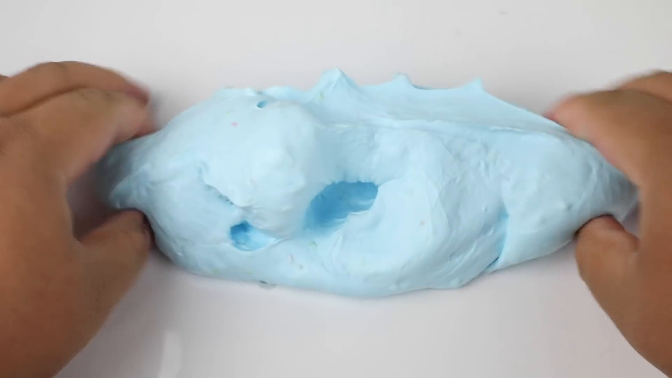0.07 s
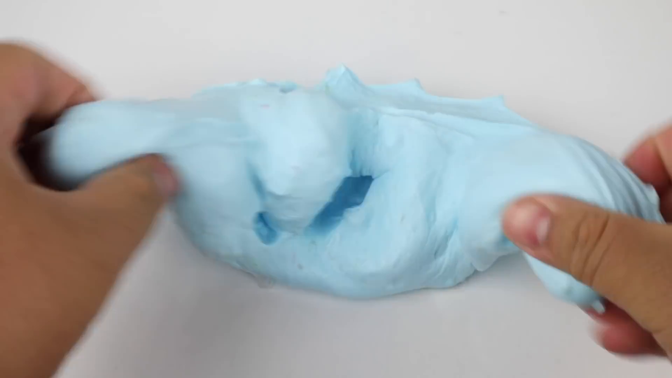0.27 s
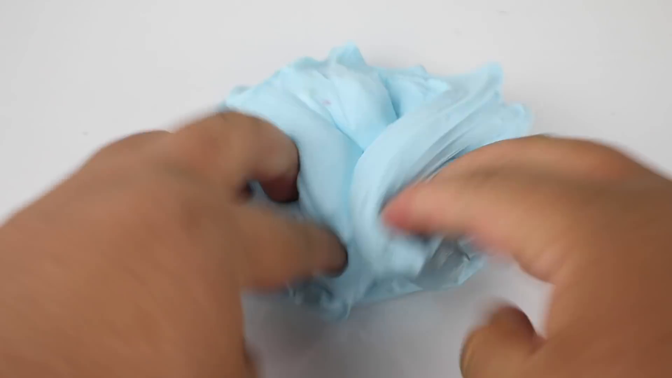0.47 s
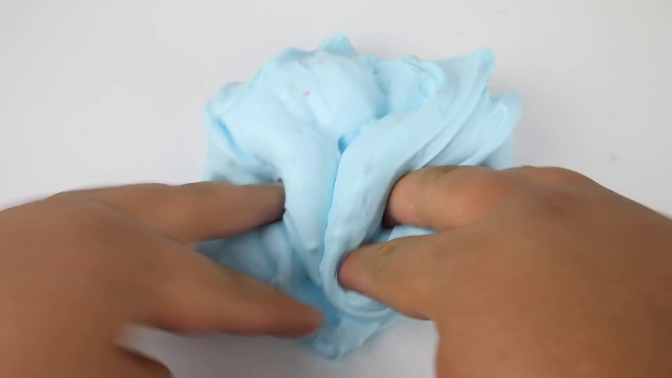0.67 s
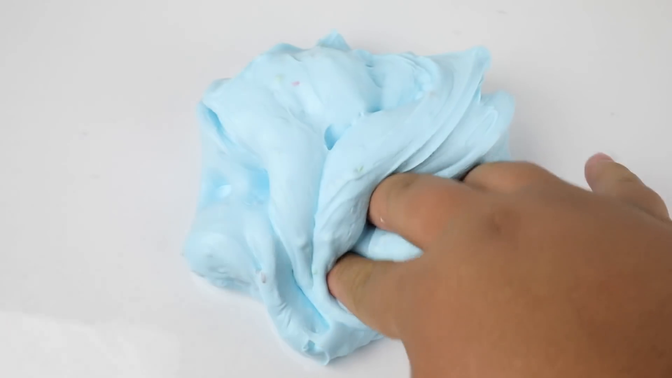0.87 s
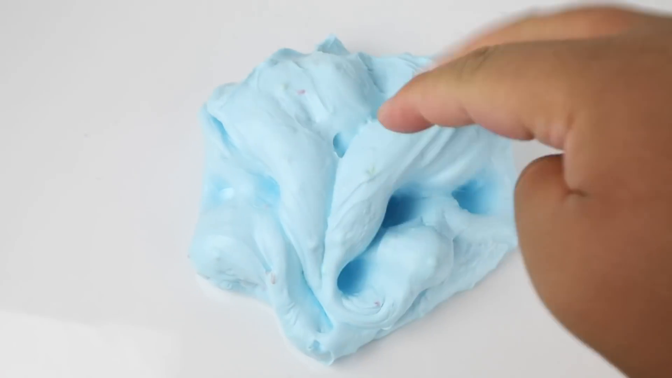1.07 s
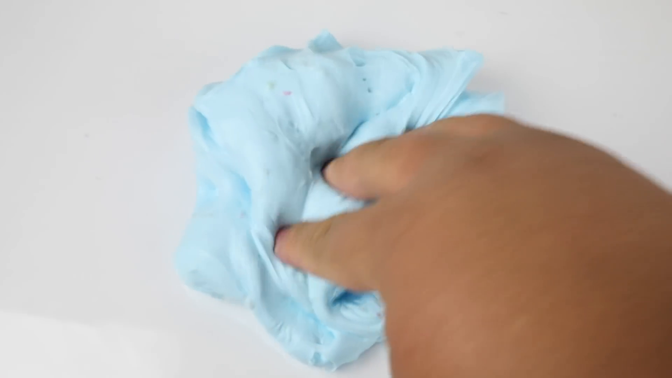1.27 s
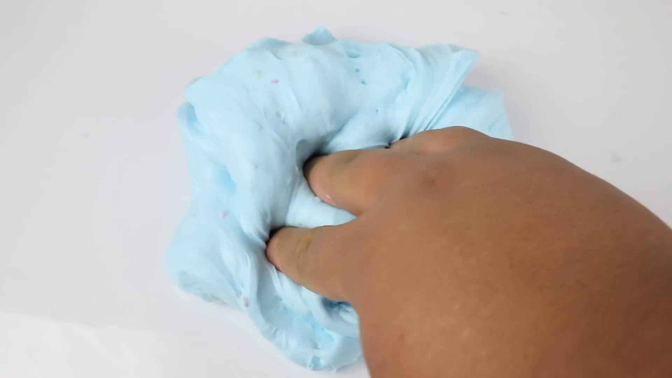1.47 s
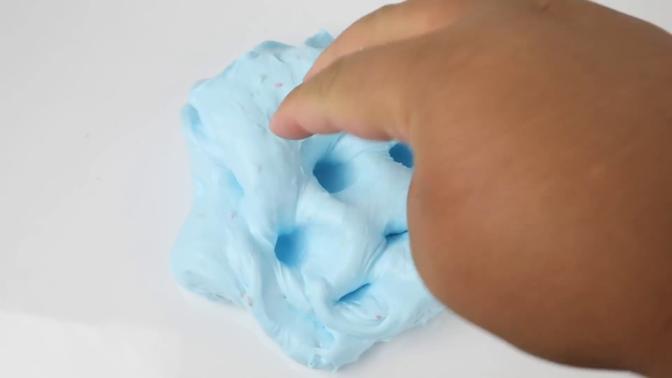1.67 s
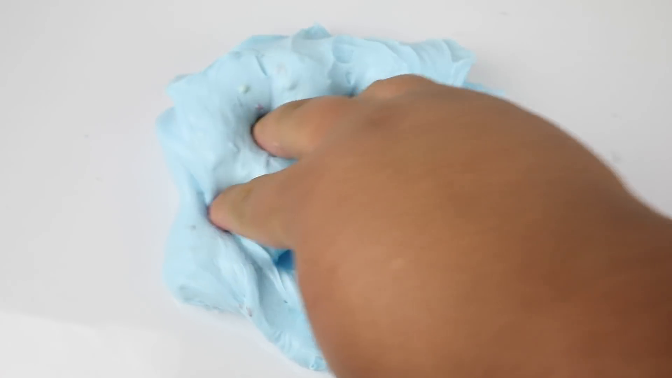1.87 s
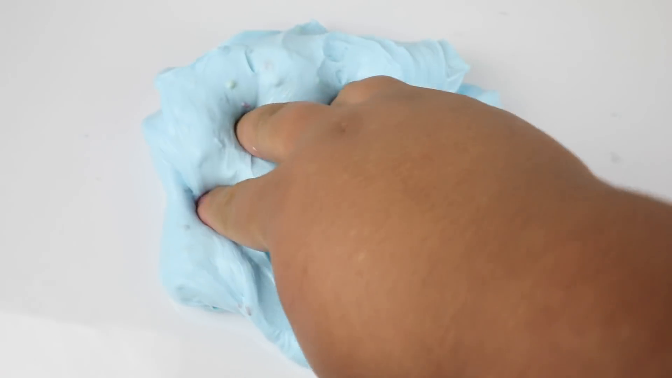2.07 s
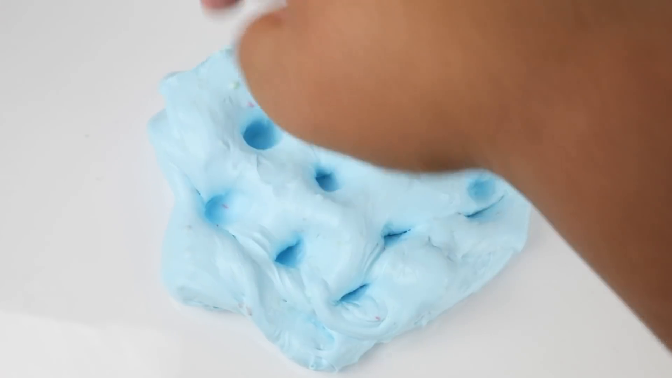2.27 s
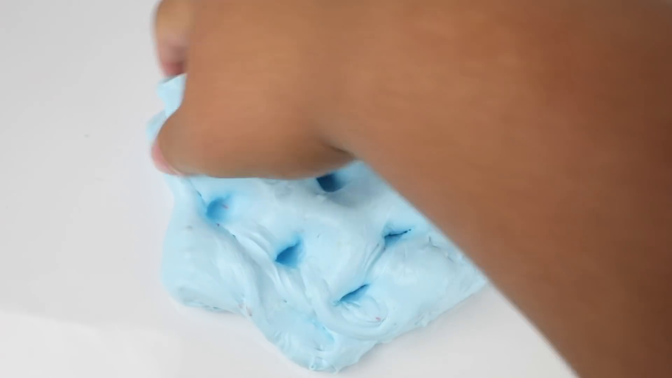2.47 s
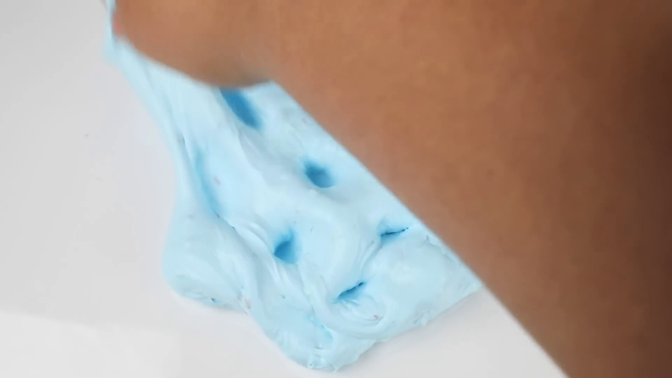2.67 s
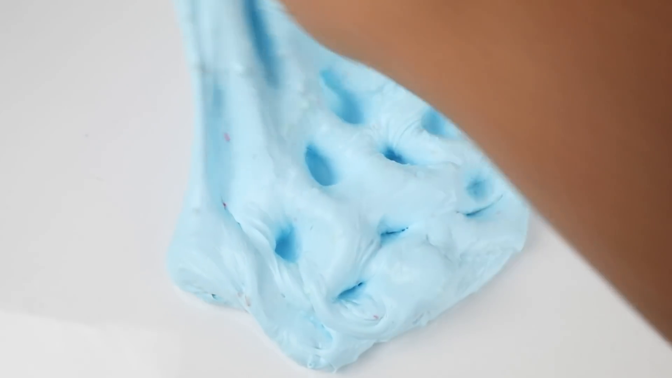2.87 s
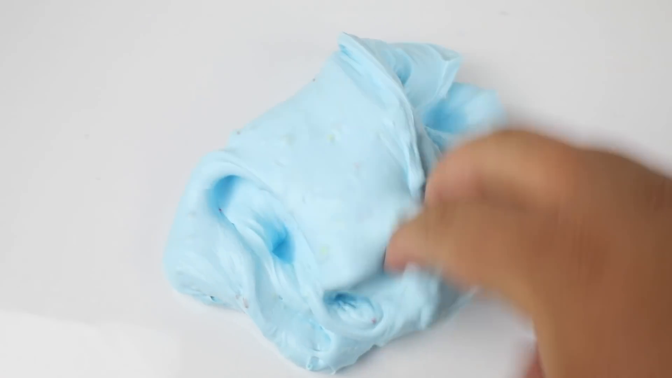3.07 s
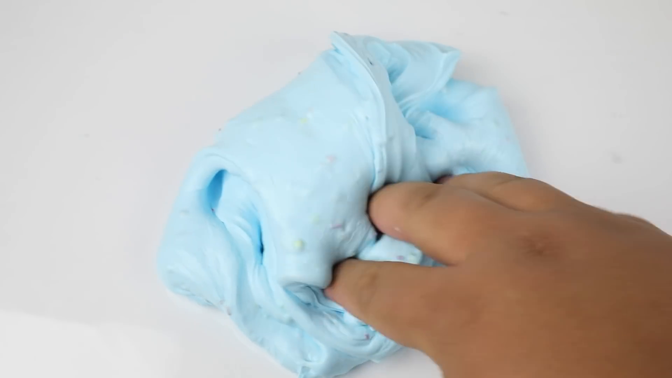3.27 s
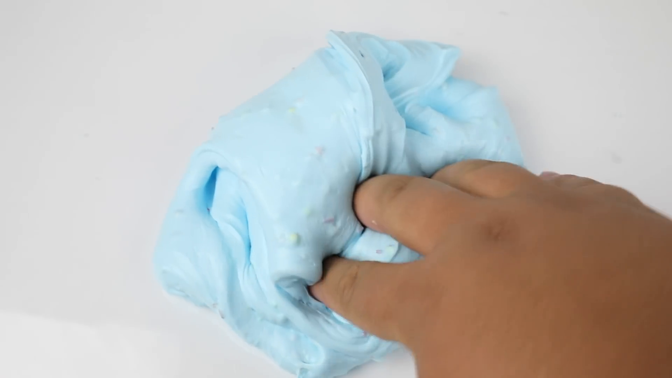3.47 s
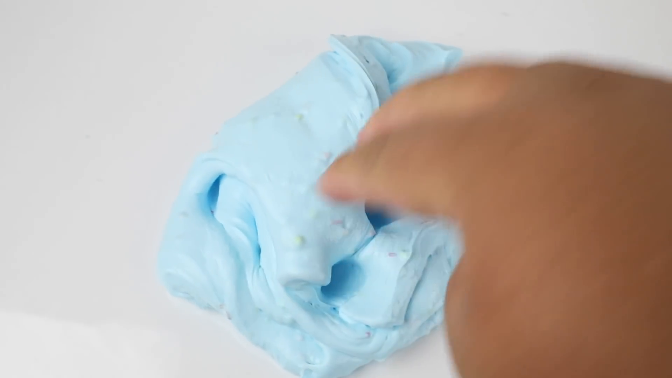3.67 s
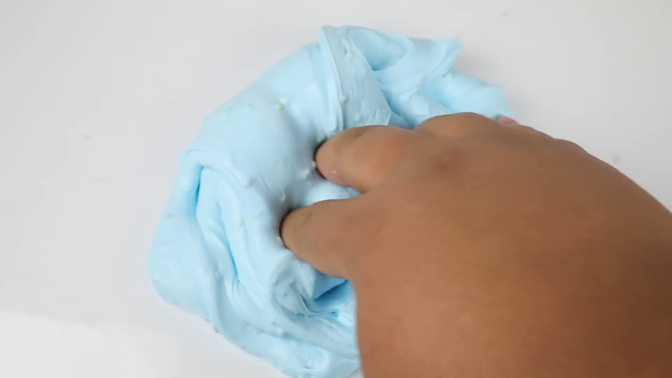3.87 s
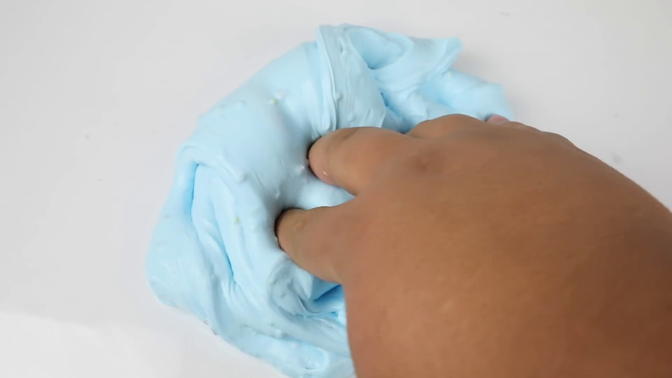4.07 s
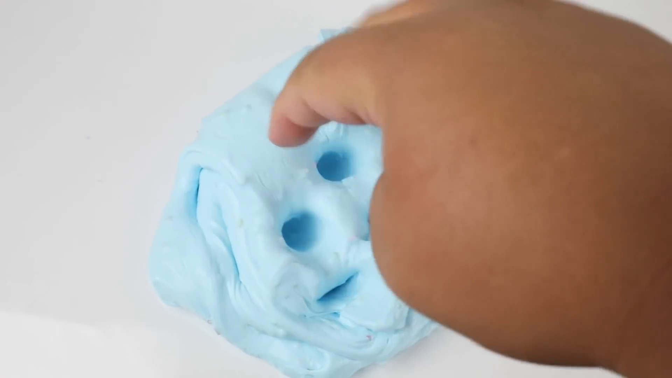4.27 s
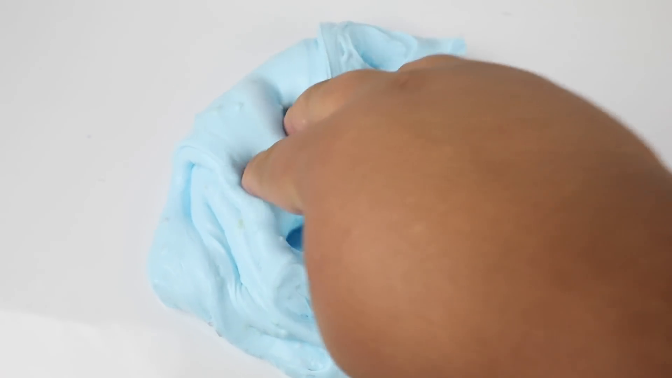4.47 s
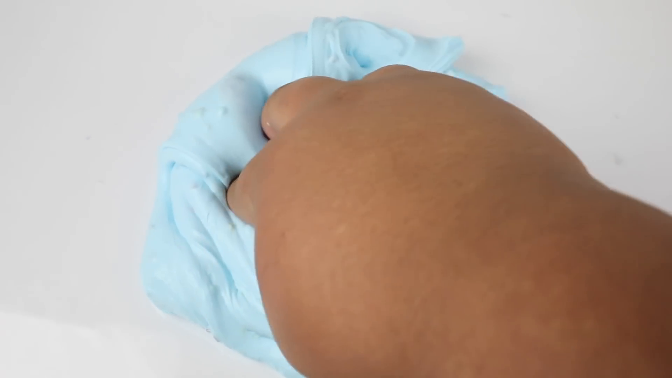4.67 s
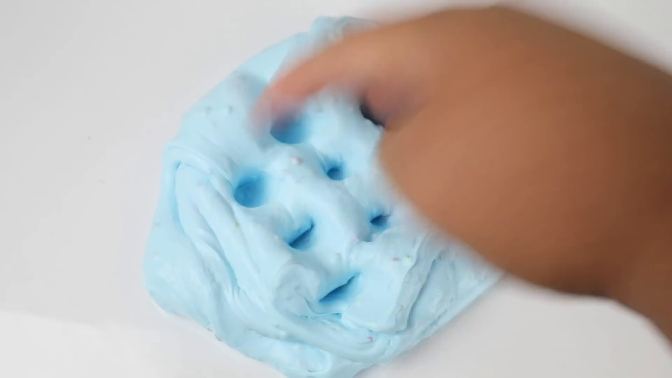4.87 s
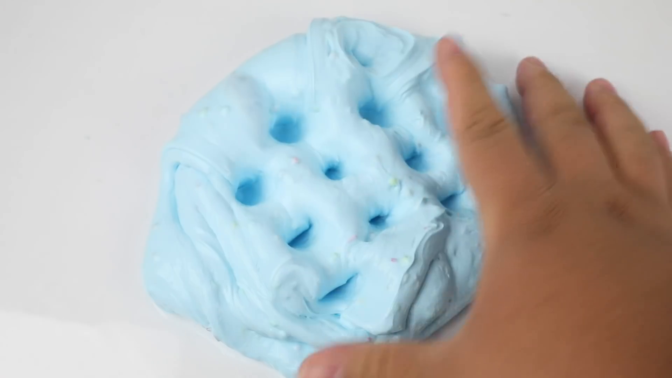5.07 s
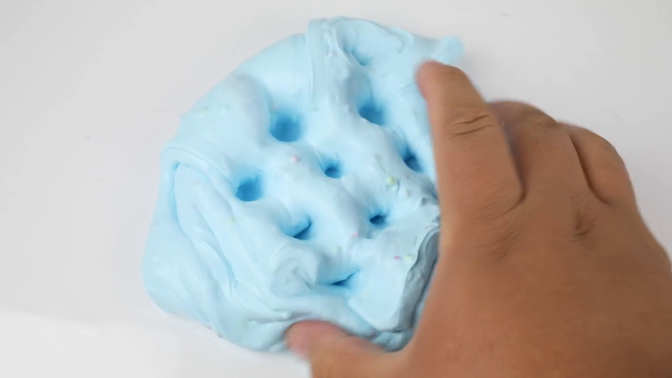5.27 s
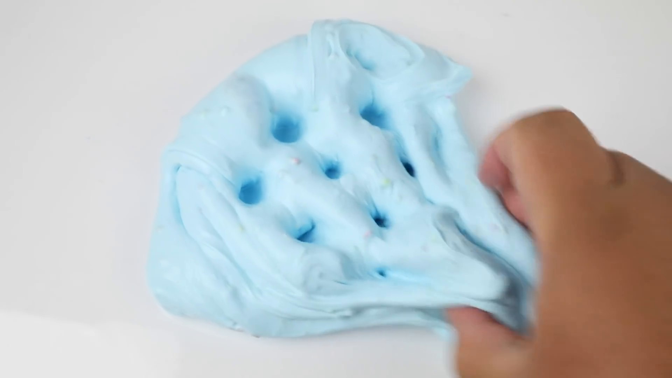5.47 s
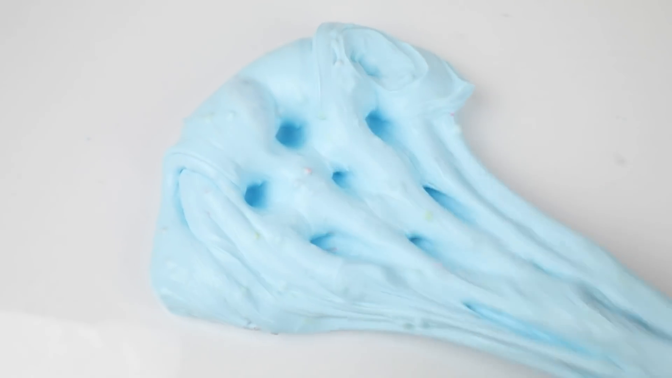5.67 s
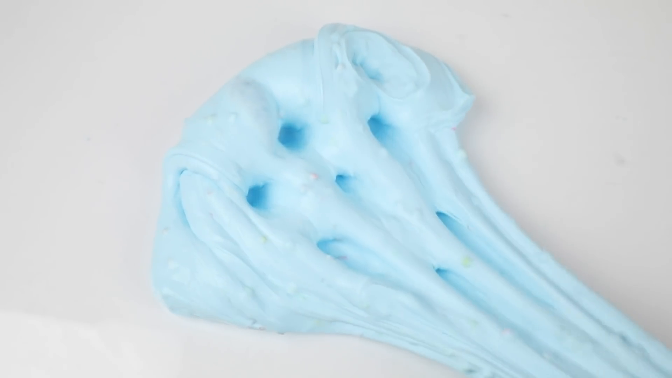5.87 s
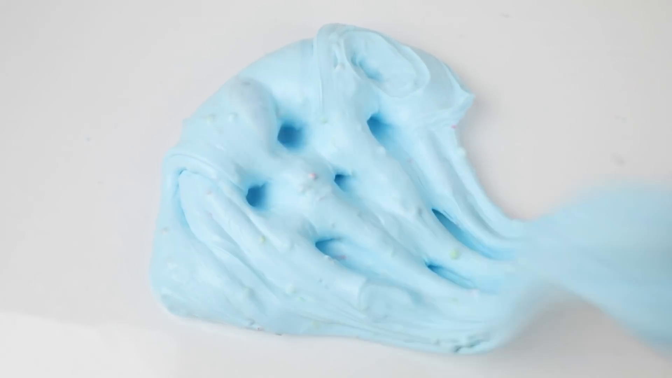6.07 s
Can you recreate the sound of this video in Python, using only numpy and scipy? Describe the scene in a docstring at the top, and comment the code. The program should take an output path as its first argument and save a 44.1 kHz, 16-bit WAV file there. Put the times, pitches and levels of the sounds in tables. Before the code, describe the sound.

Close, dry slime play: soft folding squelches, then repeated bursts of explosive wet pops as fingers poke and pull out, over quiet room air.

```python
"""A small room, close to a table: fingers poke holes in thick slime and pull out.
Each seal tears with a crack of noise, and the hole plops as a sine falling in pitch while it opens.
Pokes and hands ring the table top's modes; folding and stretching squelch in grains and hiss.
Short snaps tick, air, microphone hiss and rumble lie beneath, the room rings on behind the slime,
and the loudest pops overload the recorder."""
import sys
import numpy as np
from scipy import signal
from scipy.fft import rfft, irfft
from scipy.io import wavfile
from scipy.ndimage import uniform_filter1d

SR = 44100
rng = np.random.default_rng(int(sys.argv[2]) if len(sys.argv) > 2 else 0)


def inscribe(sig):
    """Save sig as 16-bit PCM at rate SR to the path in sys.argv[1].

    A 1-D sig is mono; a 2-D sig holds one channel per row.
    Samples are clipped to [-1, 1] before scaling.
    """
    pcm = np.round(np.clip(np.atleast_2d(sig).T, -1, 1) * 32767)
    wavfile.write(sys.argv[1], SR, pcm.astype(np.int16))


def gain_from_db(level_db):
    """Turn a decibel level (scalar or array-like) into a linear amplitude factor."""
    decades = np.asarray(level_db, float) / 20
    return 10 ** decades


N = 269430  # samples in the scene
LEAD = 1024  # samples of creeping film before a pop lets go


def evened(x):
    """Scales to rms 1."""
    return x / np.sqrt(np.mean(x ** 2) + 1e-20)


def read(points, hz):
    """Reads a spectrum on a log-frequency axis."""
    f, value = np.transpose(points)
    return np.interp(np.log(hz + 1), np.log(f + 1), value)


def add(mix, s, sound):
    """Mixes a sound in at s seconds."""
    part = mix[round(s * SR):][:len(sound)]
    part += sound[:len(part)]


def coloured(x, points):
    """Filters x by the gains in dB of the points."""
    gain = gain_from_db(read(points, np.fft.rfftfreq(len(x), 1 / SR)))
    return irfft(rfft(x) * gain, len(x))


# spectrum of room air and microphone hiss: [f/Hz, relative level/dB per Hz]
AIR_SPECTRUM = [(15, -32.5), (40, -7), (75, 2.5), (155, -7), (300, -5.5), (520, -16), (1900, -30),
                (15000, -38), (16300, -47.5)]
# rumble of hands leaning on the table: [t/s, level/dB]
LEANING_RUMBLE = [(0, -45.5), (3.001, -72.5), (3.148, -51.5), (3.299, -66), (4.62, -61.5), (4.798, -47),
                  (4.9, -57.5), (5.15, -46), (5.301, -55), (5.451, -45), (5.9, -73)]


def background(air_db=-54):
    """Steady room air and microphone hiss, and a low rumble through the table, all shaped noise."""
    air = gain_from_db(air_db) * evened(coloured(rng.standard_normal(N), AIR_SPECTRUM))
    low_spectrum = [(15, -17.5), (45, -1.0), (80, 4.0), (150, -3.5), (500, -42)]
    low = evened(coloured(rng.standard_normal(N), low_spectrum))
    s, db = np.transpose(LEANING_RUMBLE)
    return air + gain_from_db(np.interp(np.arange(N) / SR, s, db)) * low


# decay of the room: [f/Hz, t60/s]
ROOM_DECAY = [(200, 0.36), (600, 0.31), (2000, 0.32), (5000, 0.27), (9000, 0.25), (14000, 0.25)]
# what the walls return: [f/Hz, relative level/dB]
WALL_RETURN = [(350, 7), (560, 0.5), (1300, 0), (2200, 2.5), (3200, 0.5), (4400, 2), (6000, -2),
               (14000, -2)]


def room(x, first_ms=3, late_db=-25, late=2.2, patchy_db=1.5):
    """Sparse taps of random sign, each band dying at its own speed in uneven patches,
    with a faint afterglow that dies late times slower."""
    taps = np.zeros(SR)
    at = np.arange(round(first_ms * SR / 1000), SR - 20, 20)
    taps[at + rng.integers(0, 20, len(at))] = rng.choice([-1., 1.], len(at))
    hz, t, z = signal.stft(taps, SR, nperseg=256)
    fall_db = 60 * t / read(ROOM_DECAY, hz)[:, None]
    z *= gain_from_db(read(WALL_RETURN, hz)[:, None]) * (gain_from_db(-fall_db) + gain_from_db(late_db - fall_db / late))
    patches = evened(uniform_filter1d(rng.standard_normal(z.shape), 12, axis=1))
    z *= gain_from_db(patchy_db * patches)
    tail = signal.istft(z, SR, nperseg=256)[1]
    return signal.fftconvolve(x, tail / np.linalg.norm(tail))[:N]


# squelches of folding and stretching: [middle t/s, level/dB, length/ms, treble tilt/dB per octave]
SQUELCHES = [(0.085, -41.5, 10, -0.5), (0.132, -50.5, 29, 0), (0.2, -41.5, 44, 1.5), (0.237, -40, 11, 0),
             (0.29, -50, 100, 3.5), (0.356, -51, 30, 3), (0.447, -47, 39, 4.5), (0.588, -52.5, 57, 2),
             (0.766, -37, 33, 3), (0.793, -48.5, 20, 6), (2.627, -47.5, 27, 0.5), (2.708, -49, 72, 3.5),
             (3.094, -55, 63, 4.5), (3.852, -53.5, 84, 2.5), (4.615, -52.5, 12, 1), (5.424, -44.5, 36, 2.5),
             (5.49, -55, 320, 2.5), (5.523, -54.5, 30, 1), (5.636, -46.5, 25, -2), (5.698, -52, 28, 3.5),
             (5.76, -67.5, 116, 1.5), (6.092, -53, 27, 3)]
# colour of the sticky slime: [f/Hz, relative level/dB per Hz]
SQUELCH_SPECTRUM = [(250, 0.5), (500, 2), (1350, 0), (1750, -5.5), (2200, -4), (3300, -9.5), (4400, -6.5),
                    (5500, -14), (16000, -20)]


def kneading(per_s=3500, spread_db=4, hiss=1.1, clump_db=2.2):
    """Tiny bubbles burst in clumps inside a sticky hiss that swells and fades with each squelch."""
    size = gain_from_db(spread_db * np.minimum(rng.exponential(1, N), 4))
    size *= rng.random(N) < per_s / SR
    kind, grains, u = rng.integers(0, 24, N), np.zeros(N), np.arange(600) / SR
    for k, hz in enumerate(np.geomspace(500, 9000, 24)):
        bubble = np.sin(2 * np.pi * hz * u) * np.exp(-u * (hz / 7 + 200))
        bubble *= hz ** 0.06 / np.linalg.norm(bubble)
        grains += signal.oaconvolve(size * (kind == k), bubble)[:N]
    clumps = evened(uniform_filter1d(uniform_filter1d(rng.standard_normal(N), 200), 200))
    sticky = evened(grains) + hiss * rng.standard_normal(N)
    mixed = gain_from_db(clump_db * clumps) * coloured(sticky, SQUELCH_SPECTRUM)
    out, ms = np.zeros(N + 8192), np.arange(-8192, 8192) / SR * 1000
    for s, db, length_ms, tilt_db in SQUELCHES:
        part = np.roll(mixed, 8192 - round(s * SR))[:16384]
        # six octaves from end to end
        part = evened(coloured(part, [(250, -3 * tilt_db), (16000, 3 * tilt_db)]))
        swell = np.exp(-2 * (ms / length_ms) ** 2)
        add(out, s, gain_from_db(db) * part * swell)
    return out[8192:]


# hands and slime landing on the table: [t/s, relative level/dB, lean of the landing place/dB]
LANDINGS = [(0.08, -20.5, 6), (0.757, -19, 0.5), (0.785, -18, -1.5), (2.501, -11.5, 13)]
# modes of the table top: [f/Hz, relative level/dB, t60/s, share of the lean (signed factor)]
TABLE_MODES = [(80.3, -3.5, 0.48, -0.42), (132.4, 3, 0.16, 0.031), (191, 5, 0.36, -1),
               (210, 2, 0.13, -0.77), (301.3, 4, 0.15, 0.27), (378, -0.5, 0.2, 0.2),
               (586, -13.5, 0.093, -1), (760, -4.5, 0.066, 0.84)]


def table(lag_s=0.0033, kick_ms=0.2, hand_ms=0.62):
    """A rounded push, slower from a soft hand, rings the table; its place favours some modes over others."""
    out, t = np.zeros(N), np.arange(SR // 2) / SR
    at, crack_db, _, plop_db, *_ = np.transpose(POCKETS)
    # less than 0.06 s after the pocket before, a finger lands at another place: lean in dB
    lean_db = np.where(np.diff(at, prepend=-1) < .06, 10.5, 3.5)
    # every bursting pocket kicks the table, at a level following its crack and plop
    kick_db = -14 + (crack_db + plop_db) / 2
    pushes = [(*landing, hand_ms) for landing in LANDINGS]
    pushes += [(*kick, kick_ms) for kick in zip(at, kick_db, lean_db)]
    for s, db, place_db, contact_ms in pushes:
        push = t[:600] * np.exp(-t[:600] * 1000 / contact_ms)
        ring = np.zeros(len(t))
        for hz, level_db, t60, lean in TABLE_MODES:
            ring += gain_from_db(level_db + lean * place_db - 60 * t / t60) * np.sin(2 * np.pi * hz * t)
        add(out, s + lag_s, gain_from_db(db - 10.0) * signal.fftconvolve(ring, push / push.sum()))
    return out


def pop(row, noise, fizz_db=-12, fizz_ms=6, creep_db=-48, creep_ms=12, rip_db=-26, rip_ms=0.89,
        snap=0.63, glide=3.3, cycles=0.55, narrow=0.55, start=0.3, least_ms=0.37):
    """A film creeps and snaps and tears in a crack; the air in the hole swings, falling in pitch as it opens."""
    _, crack_db, crack_hz, plop_db, plop_hz, open_ms = row
    ms = (np.arange(len(noise)) - LEAD) / SR * 1000
    before, ms = np.minimum(ms, 0), np.maximum(ms, 0)

    r = np.exp(-np.pi * .35 * crack_hz / SR)  # the torn lip rings broadly
    poles = [1, -2 * r * np.cos(2 * np.pi * crack_hz / SR), r * r]
    lip = evened(signal.lfilter([1], poles, noise))
    # the seal lets go with one sharp pull of air
    suck = signal.lfilter([1, 1, -1, -1], poles, np.arange(len(noise)) == LEAD)

    tear_ms = least_ms + 0.074 * open_ms  # slow openings tear longer
    tear = np.exp(-(ms / tear_ms) ** 2) + gain_from_db(fizz_db) * np.exp(-ms / fizz_ms)
    creep = gain_from_db(creep_db) * np.exp(before / creep_ms) + gain_from_db(rip_db) * np.exp(before / rip_ms)
    crack = (0.79 * noise + 0.69 * lip) * np.where(before < 0, creep, tear)
    crack -= snap * suck / abs(suck).max()
    body = crack[LEAD:][:round(tear_ms * 27) + 6]  # its loud first part sets the level
    crack *= gain_from_db(crack_db) / (1.154 * np.sqrt(np.mean(body ** 2)))

    fall_ms = 0.17 * open_ms
    # the pitch starts (1 + glide) times higher and settles on plop_hz
    turns = start + plop_hz / 1000 * (ms - open_ms - glide * fall_ms * np.exp(-ms / fall_ms))
    opening = np.minimum(ms / open_ms, 1) ** 0.61
    lasting = cycles * (plop_hz / 500) ** narrow  # cycles until the swing falls to 1/e
    dying = np.exp(-np.maximum(ms - open_ms, 0) * plop_hz / 1000 / lasting)
    return crack + gain_from_db(plop_db) * opening * dying * np.sin(2 * np.pi * turns)


# air pockets bursting: [t/s, crack level/dB, crack f/Hz, plop level/dB, plop f/Hz, opening time/ms]
POCKETS = [(0.228, -32.5, 2480, -20.5, 1470, 0.92), (0.7406, -22.5, 4475, -31, 916, 0.87),
           (1.0726, 4, 4710, -6, 639, 4.1), (1.0928, -1, 1518, -3, 799.6, 2.4),
           (1.095, -4.5, 4598, -6.5, 483.6, 4.73), (1.1047, -10.5, 8940, -5.5, 400, 1.2),
           (1.1091, 1.5, 3414, -10, 728, 2.8), (1.4368, -36, 4180, -34, 951, 0.54),
           (1.655, 5.5, 4560, -0.5, 731, 2.24), (1.6805, 2.5, 2890, 1, 513, 4.3),
           (1.704, -6.5, 2453, -8, 504.7, 6.3), (1.7099, -3.5, 4390, -10.5, 621.7, 2.07),
           (1.7132, -6.5, 1734, -9, 511.5, 4.3), (2.2432, -0.5, 3610, 0, 1113, 1.146),
           (2.277, 3.5, 5226, 3.5, 426.2, 2.4), (2.3004, -0.5, 4358, 2.5, 414.3, 1.7),
           (2.5047, -28.5, 8000, -12.5, 1164, 1.2), (3.6219, 0.5, 4875, -12, 383, 5.4),
           (3.6549, 2, 3970, -2, 489, 5.3), (3.665, -9.5, 3970, -20.5, 593, 3.66),
           (3.6691, -2.5, 3930, -9.5, 760, 2.47), (4.2737, 5, 3480, -1, 400.3, 3.63),
           (4.297, 0.5, 4040, -2, 465.2, 2.5), (4.3212, -4, 3637, -7, 468, 6.5),
           (4.326, -6.5, 4700, -21, 1230, 3), (4.9236, -2.5, 7580, -16.5, 596.5, 6),
           (4.945, 0, 6000, -8, 1690, 1.6), (4.9679, -4.5, 4964, -7, 502, 6.5),
           (5.4297, -30, 4030, -35, 930, 2.16), (5.481, -30.5, 4140, -32.5, 1300, 0.78)]
# short snaps, mostly faint, some sharp second cracks within loud pops: [t/s, level/dB, f/Hz]
SNAPS = [(0.2032, -37, 4340), (0.442, -50, 4220), (0.5538, -31, 2410), (0.5625, -39, 9050),
         (0.7654, -27, 10180), (1.9451, -34.5, 1255), (2.5694, -45.5, 3950), (2.6237, -35, 2370),
         (2.677, -43, 1980), (3.186, -35, 1290), (3.2821, -36.5, 4895), (3.8307, -38, 8440),
         (4.9254, -4.5, 8030), (4.945, -5.5, 8240), (5.3428, -41, 2100), (5.3746, -47, 3200),
         (5.4163, -39.5, 6700), (5.5126, -33.5, 2050), (5.523, -40, 2110), (5.5662, -50, 1900),
         (5.6411, -42.5, 4000), (5.654, -37, 1900)]
# colour of the tearing noise: [f/Hz, relative level/dB]
CRACK_SPECTRUM = [(400, -14), (1200, -2), (2500, -12), (5200, -7), (7500, -11.5), (11000, -15),
                  (16000, -22.5)]


def pops(ring_db=-3, open_ms=0.8):
    """Pockets burst and short snaps tick, each with its own noise; a snap cracks and rings near one pitch."""
    out = np.zeros(N)
    noise = rng.standard_normal((len(POCKETS) + len(SNAPS), 4096))
    for row, hiss in zip(POCKETS, noise):
        add(out, row[0] - LEAD / SR, pop(row, evened(coloured(hiss, CRACK_SPECTRUM))))
    for (s, db, hz), hiss in zip(SNAPS, noise[len(POCKETS):]):
        peaked = evened(coloured(hiss, [(hz / 10, -20), (hz, 0), (hz * 10, -36)]))
        row = (s, db, hz, db + ring_db, hz, open_ms)
        add(out, s - LEAD / SR, pop(row, peaked, snap=.4, rip_db=-14.5, least_ms=1.3))
    return out


def scene():
    """Slime and table close to the microphone, the room behind the slime, the background beneath."""
    slime = pops() + kneading()
    # the slime's echo alternates smoothly between two random room tails
    swing = np.pi / 2 * np.sin(2 * np.pi * 7.9 * np.arange(N) / SR) ** 2
    wet = room(slime * np.cos(swing)) + room(slime * np.sin(swing))
    close = slime + gain_from_db(-13.5) * wet + table()
    # deep bass below about 64 Hz is weak in slime, table and room
    low_cut = signal.butter(4, 64, "high", fs=SR, output="sos")
    return (signal.sosfilt(low_cut, close) + background())[None]


def low_pass(x):
    """Removes everything above the highest recorded frequency."""
    return signal.sosfilt(signal.butter(12, 16460, fs=SR, output="sos"), x)


def record(dry):
    """The microphone loses the treble above 15.8 kHz and the input clips at full scale."""
    band = signal.oaconvolve(dry, signal.firwin(255, 15800, fs=SR)[None], "same")
    return low_pass(np.clip(band, -1, 1))


dry = scene()
out = record(dry)
inscribe(out)
```